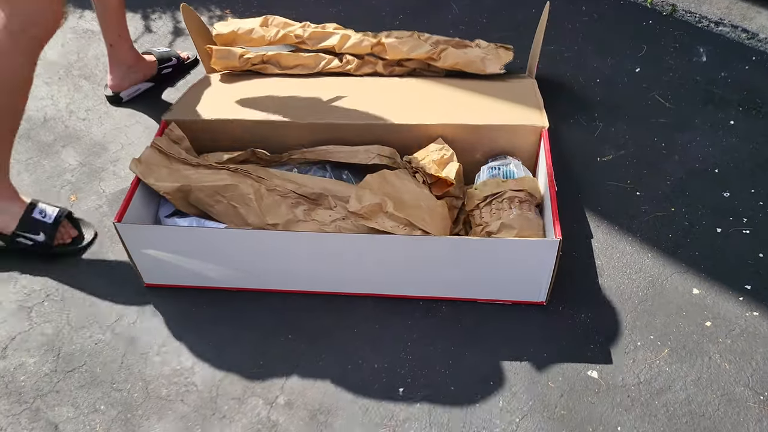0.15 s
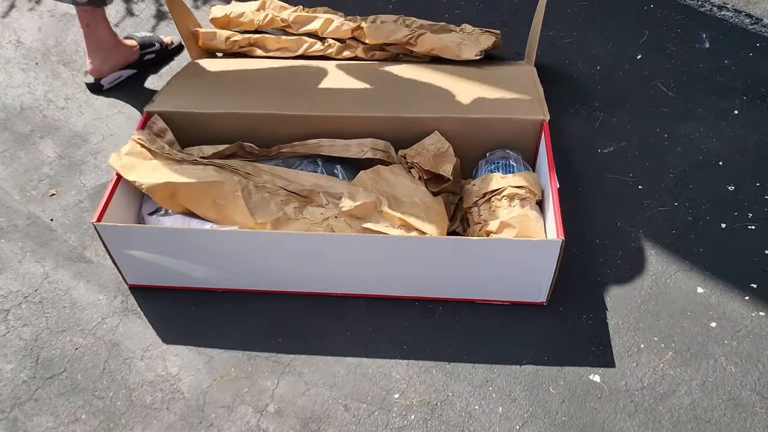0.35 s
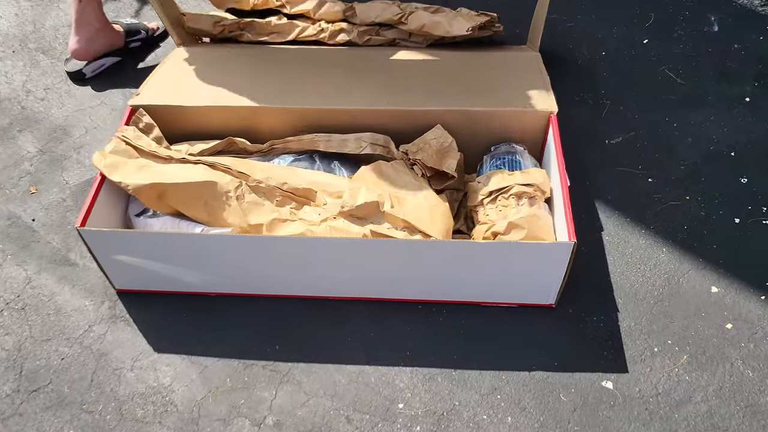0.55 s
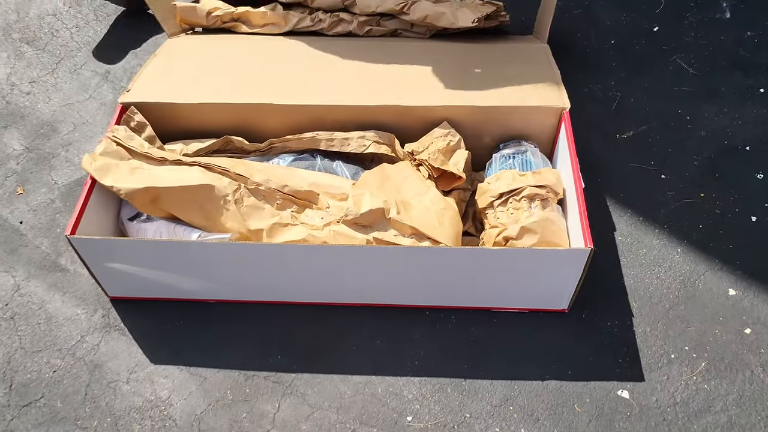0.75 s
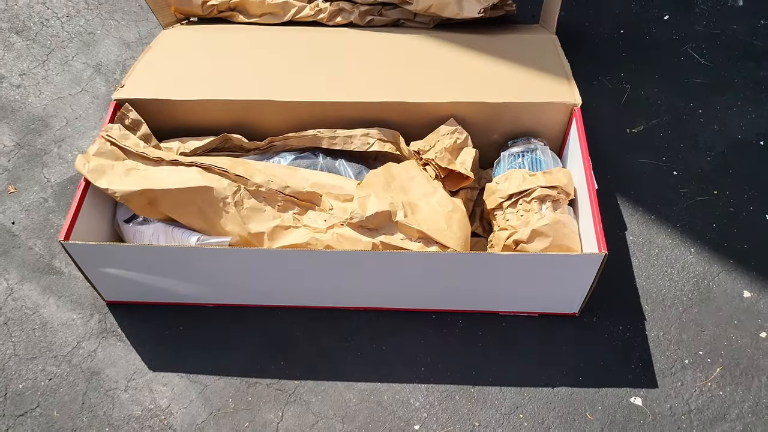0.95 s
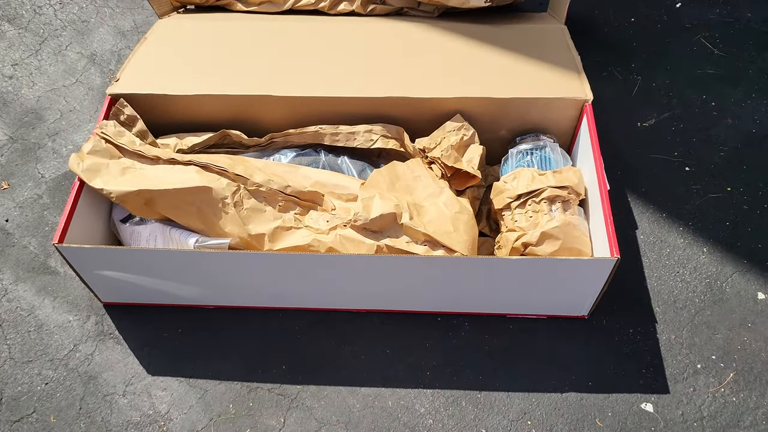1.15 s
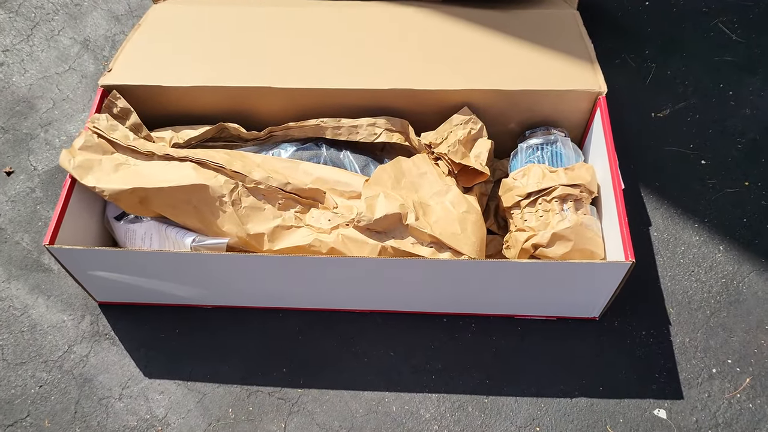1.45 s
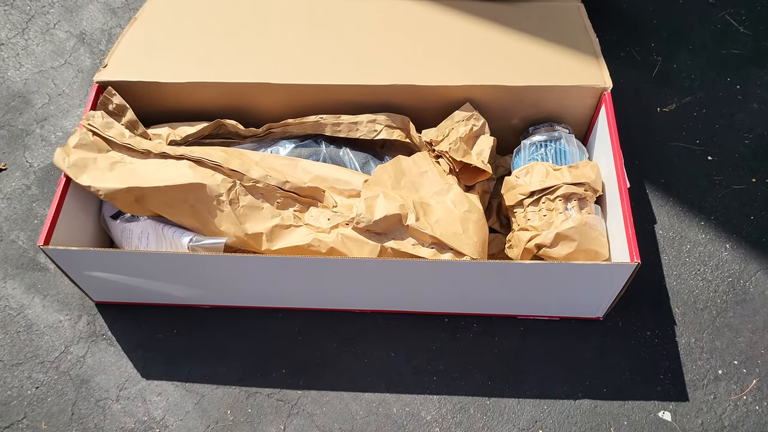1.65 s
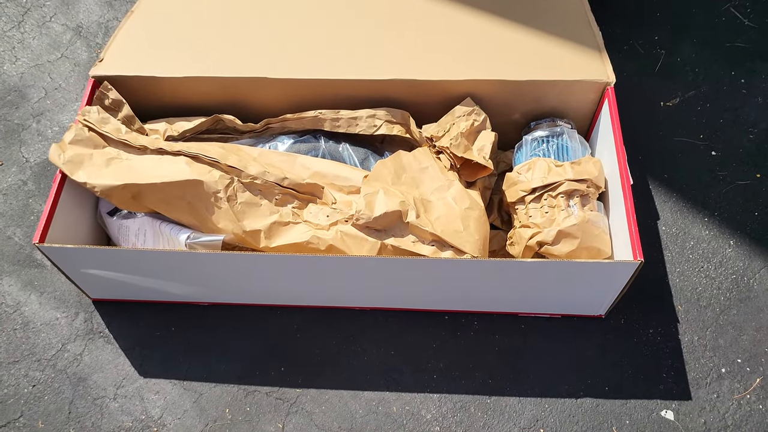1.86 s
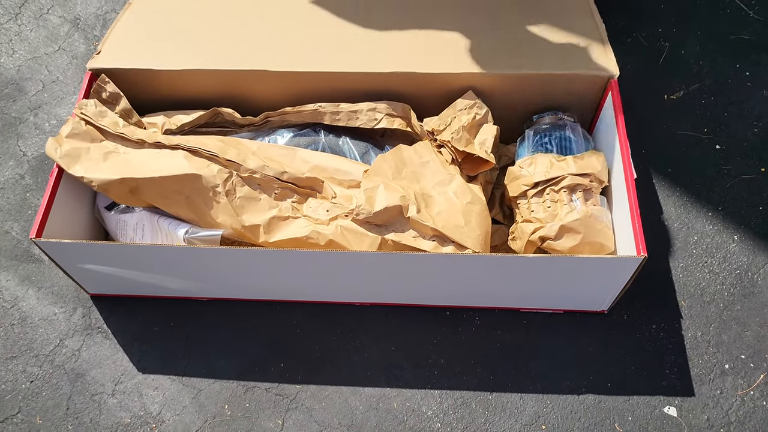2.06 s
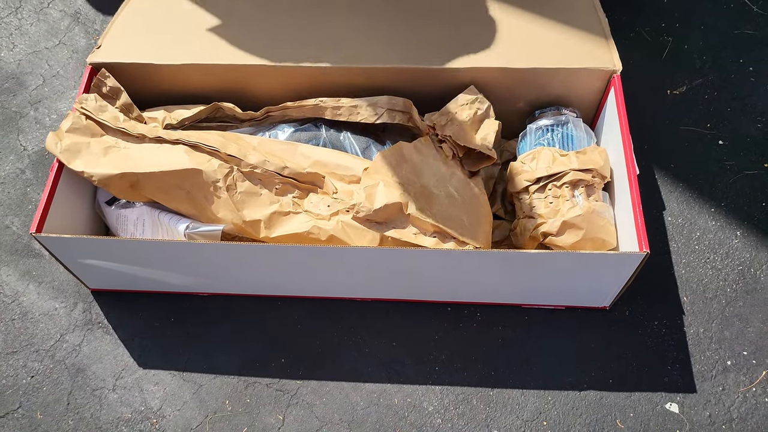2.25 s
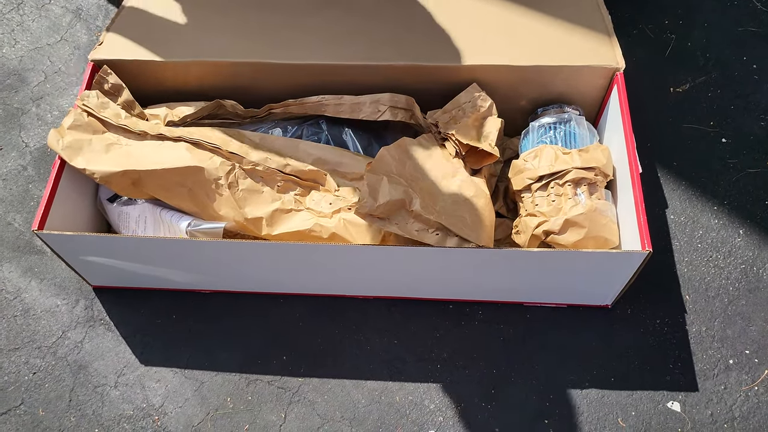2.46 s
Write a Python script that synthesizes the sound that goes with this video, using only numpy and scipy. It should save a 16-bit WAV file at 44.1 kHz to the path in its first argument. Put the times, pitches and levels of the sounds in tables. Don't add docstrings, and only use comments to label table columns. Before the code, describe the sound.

Stiff packing paper crinkles and snaps in a cardboard box outdoors, over low breeze rumble

```python
import sys
import numpy as np
from scipy import signal
from scipy.fft import rfft, irfft
from scipy.io import wavfile
from scipy.ndimage import uniform_filter1d

SR = 44100
rng = np.random.default_rng(int(sys.argv[2]) if len(sys.argv) > 2 else 0)


def materialize(psi):
    bounded = np.clip(np.atleast_2d(psi).T, -1, 1)
    quanta = np.round(bounded * 32767).astype(np.int16)
    wavfile.write(sys.argv[1], SR, quanta)


def rack_gain(trim_db):
    fader = np.asarray(trim_db, float)
    return 10 ** (fader / 20)


N = 114660


def evened(x):
    return x / np.sqrt(np.mean(x ** 2) + 1e-20)


def read(points, hz):
    point_hz, value = np.transpose(points)
    return np.interp(np.log(hz + 1), np.log(point_hz + 1), value)


def add(mix, start_s, sound):
    part = mix[..., max(round(start_s * SR), 0):][..., :sound.shape[-1]]
    part += sound[..., :part.shape[-1]]


def slow(seconds):
    size = max(int(seconds * SR), 1)
    return evened(uniform_filter1d(uniform_filter1d(rng.standard_normal(N), size), size))


def colour(x, gain, lag_s=0.):
    hz = np.fft.rfftfreq(N, 1 / SR)
    delay = np.exp(-2j * np.pi * hz * lag_s)
    return irfft(rfft(x) * gain(hz) * delay, N)


def resonate(x, hz, width_hz):
    turn = np.exp(2j * np.pi * np.cumsum(hz * np.ones(len(x))) / SR)
    r = np.exp(-np.pi * width_hz / SR)
    for _ in range(2):
        x = 2 * (turn * signal.lfilter([1 - r], [1, -r], x / turn + 1e-18)).real
    return x


def wash():
    # hz, level_db_per_hz
    wash_spectrum = [(88, -37.5), (150, -14), (396, -28), (472, -30), (879, -24), (1030, -25),
                     (4410, -44.5), (8050, -60), (15600, -68.5)]
    # hz, likeness_0_to_1
    likeness = [(200, 0.15), (1200, 0.85414), (3000, 0.093), (8000, 0.083)]

    def alike(hz):
        return read(likeness, hz)

    def tone(hz):
        low_cut = hz ** 4 / (hz ** 4 + 196.26 ** 4)
        high_cut = 1 / (1 + (hz / 12900) ** 24)
        return rack_gain(read(wash_spectrum, hz)) * low_cut * high_cut

    left, own = rng.standard_normal((2, N))
    right = colour(left, alike, lag_s=0.00043868) + colour(own, lambda hz: np.sqrt(1 - alike(hz) ** 2))
    level_db = -55 + 0.786 * slow(0.024)
    return rack_gain(level_db) * evened(np.array([colour(x, tone) for x in (left, right)]))


def wind():
    # time_s, level_db, left_minus_right_db
    breeze = [
        (0.0, -43.5, 7.5),
        (0.72, -43, 1.5),
        (0.95, -44.5, 10.5),
        (1.85, -42, 11),
        (2.6, -41, -10),
    ]
    # hz, level_db_per_hz
    rumble = [(8.8, -57), (15, -22.5), (38, 1), (86, 1), (128, -4.5), (253, -15.5), (355, -20),
              (427, -33.5), (600, -34.5), (780, -30), (1320, -120)]
    # centre_s, peak_db, pitch_hz, cycles, left_minus_right_db
    buffets = [(2.213, -28.5, 65.26, 1.214, -8), (2.239, -27.5, 70.34, 1.558, -9),
               (2.329, -21.5, 98.48, 1.176, -9), (1.112, -34, 80.77, 1.357, 11.5),
               (1.3, -35.5, 56.15, 1.507, 12), (.419, -37, 237, 2.867, 0.5531),
               (.57, -44.5, 213.76, 13.87, -1), (1.647, -35.5, 81.3, 1.208, 13.5),
               (.36, -36, 87.56, 1.402, 5.5), (.505, -35.5, 65.5, 1.582, 5),
               (1.148, -35, 87.87, 1.4675, 11.5)]
    shared_share, lump_db, lump_s = .2, 1.8, .02
    t = np.arange(N) / SR
    s, db, pan_db = np.transpose(breeze)
    shared, out = rng.standard_normal(N), np.zeros((2, N))
    for port, side in enumerate((.5, -.5)):
        air = (shared_share * shared + rng.standard_normal(N)) * rack_gain(lump_db * slow(lump_s))
        turbulence = evened(colour(air, lambda hz: rack_gain(read(rumble, hz))))
        out[port] = turbulence * rack_gain(np.interp(t, s, db + side * pan_db))
    u = np.arange(-.05, .05, 1 / SR)
    for centre_s, peak_db, hz, cycles, pan_db in buffets:
        push = np.exp(-(2 * u * hz / cycles) ** 2) * np.sin(2 * np.pi * hz * u + 0.8836)
        add(out, centre_s - .05, rack_gain(peak_db) * push * rack_gain([[pan_db / 2], [-pan_db / 2]]))
    return out


def creases(gains):
    # hz, level_db_per_hz
    sheet_spectrum = [(180, -29.5), (400, -9), (720, -1.5), (1900, -0.5), (2900, -6.5), (3500, -6.5),
                      (6200, -12.5), (7800, -18), (15600, -27)]
    # time_s, low_hz, high_hz
    bends = [
        (0.0, 1424, 2229),
        (1.3, 1250, 2150),
        (1.4, 1100, 1650),
        (1.55, 900, 1700),
        (1.73, 1216, 2318),
        (2.3, 1250, 2004),
    ]
    clicks_per_s, spread_db, hiss = 6000, 3.5, 0.9
    ridge_db, ring_width_hz, box_db, ring_db = 3, 380, -9, -6
    click_db = spread_db * np.minimum(rng.exponential(1, N), 4)
    clicks = (rng.random(N) < clicks_per_s / SR) * rack_gain(click_db) * rng.choice([-1., 1.], N)
    drive = evened(clicks) + hiss * rng.standard_normal(N)

    z = signal.stft(colour(drive, lambda hz: rack_gain(read(sheet_spectrum, hz))), nperseg=512, noverlap=384)[2]
    ridges = uniform_filter1d(rng.standard_normal(z.shape), size=2, axis=0)
    ridges = evened(uniform_filter1d(ridges, size=30, axis=1))
    sheet = evened(signal.istft(z * rack_gain(ridge_db * ridges), nperseg=512, noverlap=384)[1][:N])

    s, low_hz, high_hz = np.transpose(bends)
    for bend_hz, db in (low_hz, box_db), (high_hz, ring_db), (1.242 * high_hz, ring_db - 5):
        hz = np.interp(np.arange(N) / SR, s, bend_hz) * (1 + .07 * slow(0.029647))
        sheet = sheet + rack_gain(db) * evened(resonate(drive, hz, ring_width_hz))

    def octave_band(k):
        def gain(hz):
            place = np.clip(np.log2((hz + 1) / 375), 0, 5)
            return np.clip(1 - abs(place - k), 0, 1)
        return gain

    return sum(g * colour(sheet, octave_band(k)) for k, g in enumerate(gains))


def rustle():
    # time_s, level_db, crispness_db_per_octave, air_db
    drag = [
        (0., -50.5, -0.1723, -1),
        (.12, -48, 0.8339, 0.5),
        (.28, -46, 0.0614, 3),
        (.4, -46, 2, 1.5),
        (.54, -48, 1.5, -7),
        (.64, -64, 1.48, -1.5),
    ]
    # peak_s, fade_s (to -30 dB), level_db, crispness_db_per_octave, air_db
    swells = [(0.16698, 0.0553, -42.5, -1, 4.5), (0.22249, 0.0929, -44.5, 4, 0),
              (0.43363, 0.0541, -40, 2, 4.5), (0.50177, 0.1048, -44, 3, 1.5), (0.57, 0.0545, -47, -2, -2),
              (0.76184, 0.2427, -55, 1.6006, -4.5), (1.8674, 0.4, -61, 0, 6),
              (1.092, 0.0571, -46.5, 1.867, 3), (1.08, 0.0251, -50.5, 4.5, 5), (1.23, 0.0881, -47, 3, -8),
              (1.2589, 0.1106, -51, 1, -9.5), (1.4256, 0.1259, -45, -3, 1), (1.5308, 0.1395, -54, 1, -3.5),
              (1.5, 0.2984, -71, 1, 1), (1.14, 0.0774, -58, 1.5, -3.5), (2.003, 0.0518, -48.5, 2.5, -18),
              (2.158, 0.08, -60, 1.3865, 0), (2.47, 0.12, -68, 3.5, 3), (.494, 0.0419, -38, -0.5, -2)]
    # start_s, fade_s (to -30 dB, sign ignored), level_db,
    # crispness_db_per_octave, air_db
    snaps = [(.409, 0.1356, -38.5, -1, -1), (0.488, 0.1024, -37.5, -0.5, 6.5),
             (1.0446, 0.0706, -41.5, 0.5, 7.5), (1.186, 0.1373, -51.5, 1.5, 2.5),
             (1.373, 0.133, -37.5, -3.5, -1.5), (1.396, 0.028, -41.5, 2.5, -0.5),
             (1.513, 0.1201, -47.5, 1, -10), (1.761, -0.0232, -52.5, -8.5, -30),
             (2.053, 0.0431, -45.5, -1, -14), (2.133, -0.0414, -52.5, 5.5, -9.5),
             (2.246, -0.0094, -56.5, 4.5, -9.5), (1.367, 0.0933, -49, -4.5, -8),
             (.652, .012, -53, 4, 3),
        (.704, .02, -49, 2, 0),
        (.699, .05, -50, -2, -4),
        (.893, .01, -59, 3, 3),
        (1.333, .09, -52, -1, 8),
        (1.753, .03, -53, -3, -30),
        (1.964, .03, -50, 0.5, -20),
    ]
    snap_rise_s, swell_rise_per_fade = .0012, .6
    t, octave = np.arange(N) / SR, np.arange(-2, 4)[:, None]

    def tilt(crisp, air_db):
        return rack_gain(crisp * octave + air_db * (octave == 3))

    s, db, crisp, air_db = np.transpose(drag)
    force = rack_gain(np.interp(t, s, db, right=-120))
    power = (force * tilt(np.interp(t, s, crisp), np.interp(t, s, air_db))) ** 2

    def give(peak_s, rise_s, fade_s, bend, db, crisp, air_db):
        u = t - peak_s
        fall = np.where(u < 0, (u / rise_s) ** 2, abs(u / fade_s) ** bend)
        return rack_gain(2 * db - 60 * fall) * tilt(crisp, air_db) ** 2

    for peak_s, fade_s, *tone in swells:
        power += give(peak_s, swell_rise_per_fade * fade_s, fade_s, 1.5, *tone)
    for start_s, fade_s, *tone in snaps:
        power += give(start_s + snap_rise_s, snap_rise_s, fade_s, 1, *tone)
    clumps_db = 1.3239 * slow(0.003252)
    gains = np.sqrt(power) * rack_gain(clumps_db)
    return [creases(gains) for _ in range(3)]


def folds():
    # start_s, peak_db, ring_hz, t60_s, crack_db
    single_folds = [(.401, -41, 7530, 0.0842, -29), (.414, -32.5, 1988, 0.05097, -19.5),
                    (.431, -38, 2201, 0.0533, -25), (0.435, -37, 5475, 0.0397, -24),
                    (.435, -49, 15440, 0.0298, -30), (.473, -34.5, 2269, 0.0815, -29.5),
                    (0.4864, -26.5, 1863, 0.0983, -3), (.4868, -33, 1400, 0.0567, -30),
                    (.493, -35, 2166, 0.06113, -25), (.4965, -36, 1982, 0.044, -4),
                    (.557, -39, 2212, .04, -29.5), (.7053, -52, 11020, 0.02086, -6),
                    (.7487, -51, 4977, 0.0207, -11.5), (.799, -42.5, 1087, 0.03684, -17),
                    (.798, -44.5, 723.7, 0.03605, -29.5), (1.045, -33, 546.7, 0.06582, -29.5),
                    (1.0451, -28, 1988, 0.01738, -15), (1.0455, -42, 7335, 0.0249, -19),
                    (1.0455, -46.5, 11420, 0.02616, -20), (1.061, -41.5, 2233, 0.026, -19),
                    (1.0838, -38, 2333, 0.0485, -25.5), (1.184, -39.5, 1332, 0.02642, -17.5),
                    (1.262, -42, 1849, 0.07036, -30), (1.283, -49, 3252, 0.0429, -30),
                    (1.333, -44.5, 1060, 0.03344, -15), (1.368, -33, 2194, 0.0624, -30),
                    (1.3741, -34.5, 1325, 0.0545, -8), (1.396, -35.5, 6024, 0.02073, 0.5),
                    (1.3965, -44.5, 13440, 0.01248, -20.5), (1.396, -38, 2043, 0.01898, -19),
                    (1.753, -42.5, 2692, 0.0436, -45), (1.755, -53, 4104, .04, -45),
                    (1.762, -39, 994.3, 0.02936, -29.5), (1.967, -45, 2189, 0.02872, -15),
                    (1.966, -55, 5870, .03, -10), (2.001, -35.5, 2078, 0.03165, -14),
                    (2.054, -37.5, 775.7, 0.04487, -38.5), (2.056, -46, 2086, 0.03017, -24),
                    (2.134, -47.5, 4246, 0.03494, -6.5), (2.2467, -55.5, 6220, 0.0304, -2.5)]
    # start_s, peak_db, ring_hz, t60_s
    knocks = [
        (.416, -37.5, 718.9, 0.07283),
        (.488, -35, 729, 0.083),
        (.503, -41, 851.8, 0.05445),
        (1.047, -37.5, 787.4, 0.04295),
        (1.082, -42, 881.8, 0.07158),
        (1.376, -35.5, 700.3, 0.06774),
        (1.41, -39, 853.5, 0.07913),
        (1.43, -39, 623.8, 0.0553),
        (2.003, -44.5, 3904, 0.0344),
        (1.999, -46, 4720, 0.03346),
    ]
    fold_db, blur_share, rise_turns = -1.5, 0.5544, 1.6364
    width_hz, crack_t60_s = 260, .004
    out, t = np.zeros(N), np.arange(6000) / SR
    rows = single_folds + [tuple(row) + (-60,) for row in knocks]
    for start_s, db, hz, t60_s, crack_db in rows:
        noise = rng.standard_normal(len(t))
        blur = evened(resonate(noise, hz, width_hz))
        rise = np.sin(np.pi / 2 * np.minimum(t * hz / rise_turns, 1)) ** 2
        ring = (np.sin(2 * np.pi * hz * t) + blur_share * blur) * rack_gain(-60 * t / t60_s) * rise
        crack = uniform_filter1d(np.sign(noise), size=2) * rack_gain(crack_db - 60 * t / crack_t60_s)
        add(out, start_s, rack_gain(db + fold_db) * (ring + crack))
    return out


def yard(x):
    # hz, t60_s
    decay = [(500, .25), (2000, .2), (8000, .12)]
    taps, count = np.zeros((2, SR // 2)), SR // 40 - 9
    at = 120 + 20 * np.arange(count) + rng.integers(0, 20, (2, count))
    np.put_along_axis(taps, at, rng.choice([-1., 1.], at.shape), 1)
    hz, t, z = signal.stft(taps, SR, nperseg=256)
    tail = signal.istft(z * rack_gain(-60 * t / read(decay, hz)[:, None]), SR, nperseg=256)[1]
    return signal.fftconvolve(x[None], tail / np.linalg.norm(tail[0]), axes=1)[:, :N]


def paper():
    alike, lag_s, pan_db, right_air_db, yard_db = 0.48156, 0.00006, 0.916, 2.5, -9
    shared, left, right = rustle()
    both, own = alike * shared + folds(), np.sqrt(1 - alike ** 2)
    pair = np.array([both + own * left, colour(both, np.ones_like, lag_s) + own * right])
    pair[1] = colour(pair[1], lambda hz: rack_gain(right_air_db * np.clip(hz / 6000 - 1, 0, 1)))
    return pair * rack_gain([[pan_db / 2], [-pan_db / 2]]) + rack_gain(yard_db) * yard(both)


def bird():
    # time_s, pitch_hz, level_db
    chirp = [
        (1.655, 4426, -74.5),
        (1.675, 4250, -66),
        (1.684, 3689, -64),
        (1.693, 4000, -69.5),
        (1.71, 3715, -71),
        (1.72, 3648, -90.5),
    ]
    # start_s, length_s, from_hz, to_hz, level_db
    cheeps = [
        (1.822, 0.0335, 2850, 2750, -70),
        (1.865, 0.01928, 2500, 2462, -67),
        (1.893, 0.043, 4450, 4043, -69.5),
        (1.928, 0.03324, 2600, 2580, -64),
    ]
    s, hz, db = np.transpose(chirp)
    t, out = np.arange(s[0], s[-1], 1 / SR), np.zeros(N)
    phase = 2 * np.pi * np.cumsum(np.interp(t, s, hz)) / SR
    add(out, s[0], rack_gain(np.interp(t, s, db)) * np.sin(phase))
    for start_s, length_s, from_hz, to_hz, level_db in cheeps:
        u = np.arange(0, 1, 1 / (length_s * SR))
        phase = 2 * np.pi * np.cumsum(from_hz + (to_hz - from_hz) * u) / SR
        add(out, start_s, rack_gain(level_db) * np.sin(np.pi * u) * np.sin(phase))
    return out * (1 + .7 * slow(.002))


def scene():
    return wash() + wind() + paper() + bird()


def band_limit(x):
    return signal.sosfilt(signal.butter(12, 15730, fs=SR, output="sos"), x)


def record(dry):
    dip_hz, dip_db, dip_width_hz, edge_hz = 8744.7, -9.5, 350, 15740

    def port(hz):
        return rack_gain(dip_db / (1 + ((hz - dip_hz) / dip_width_hz) ** 2)) * (hz < edge_hz)

    mix = np.array([colour(x, port) for x in dry])
    return band_limit(mix)


dry = scene()
out = record(dry)
materialize(out)
```